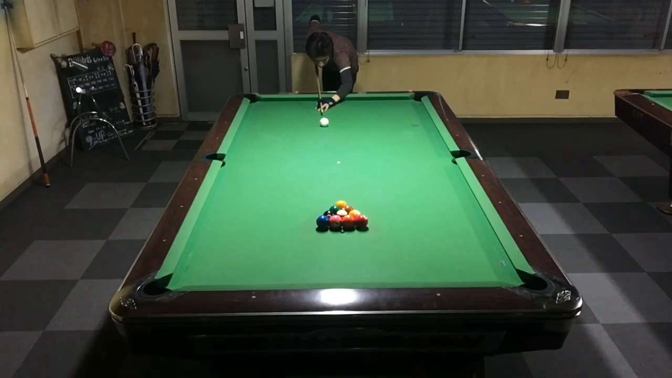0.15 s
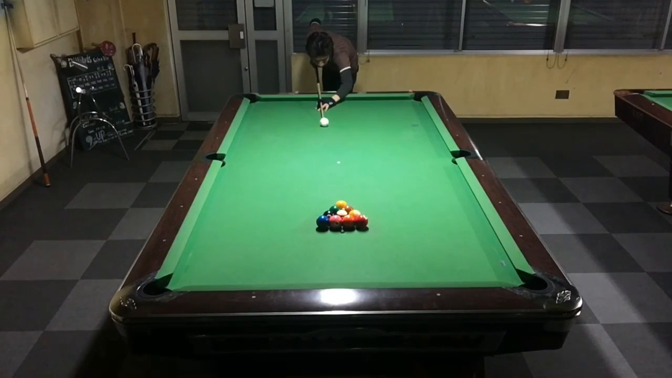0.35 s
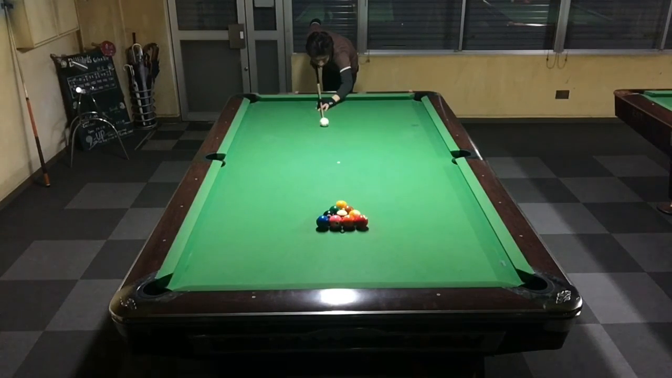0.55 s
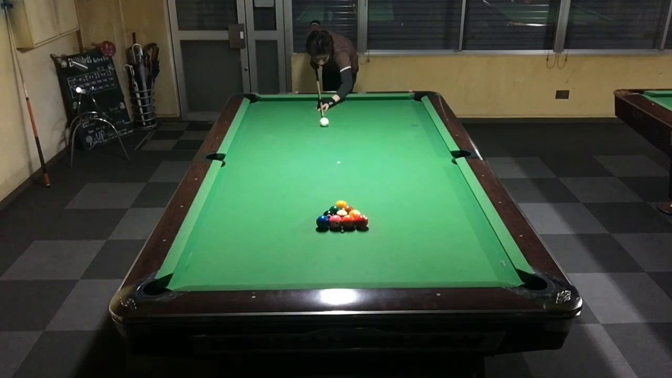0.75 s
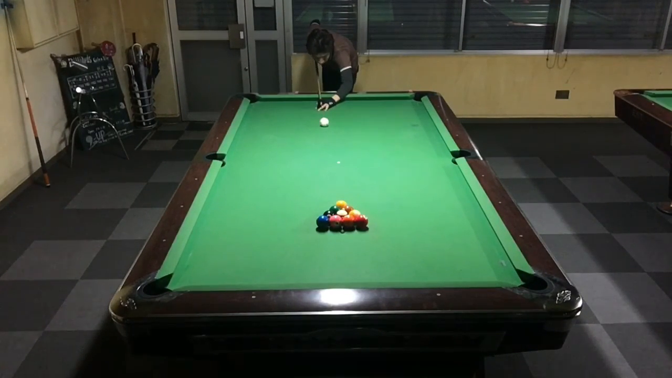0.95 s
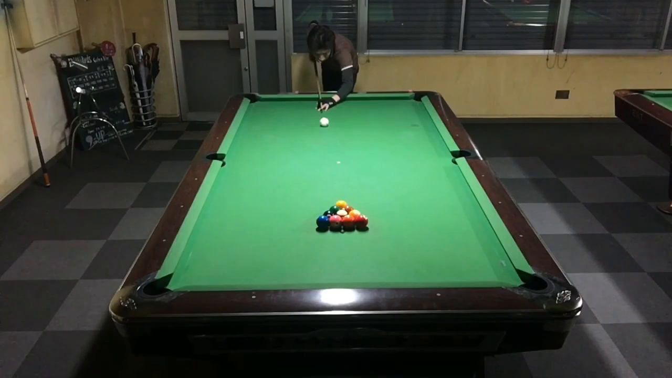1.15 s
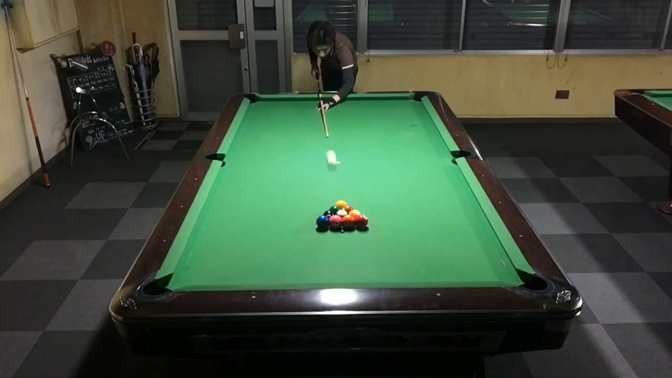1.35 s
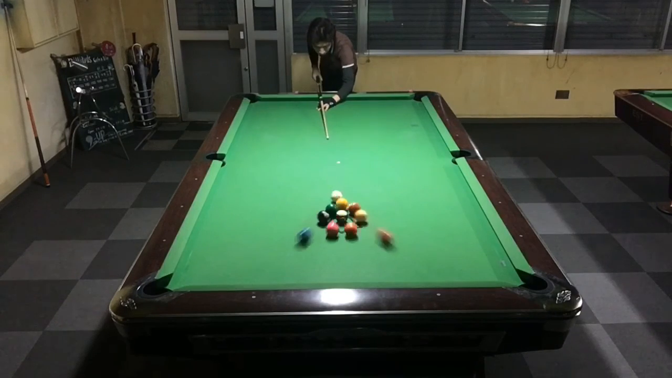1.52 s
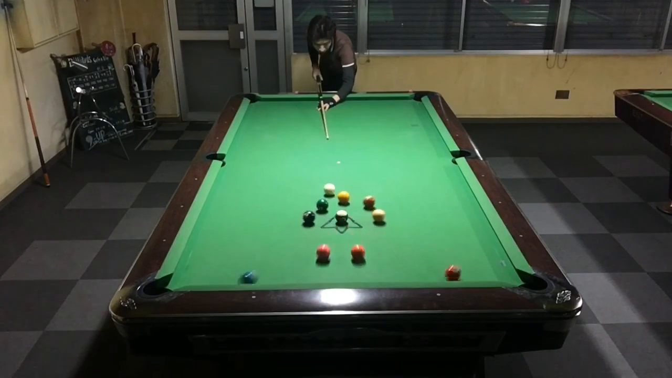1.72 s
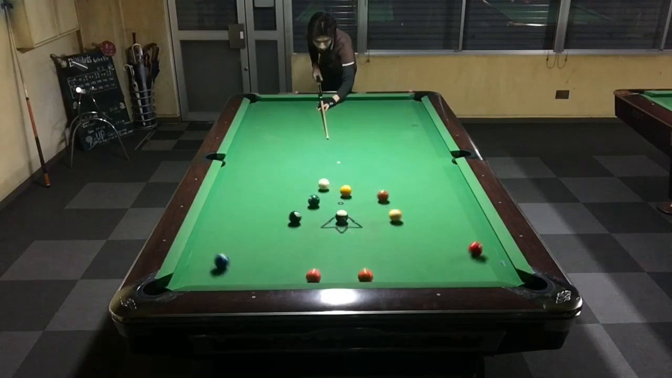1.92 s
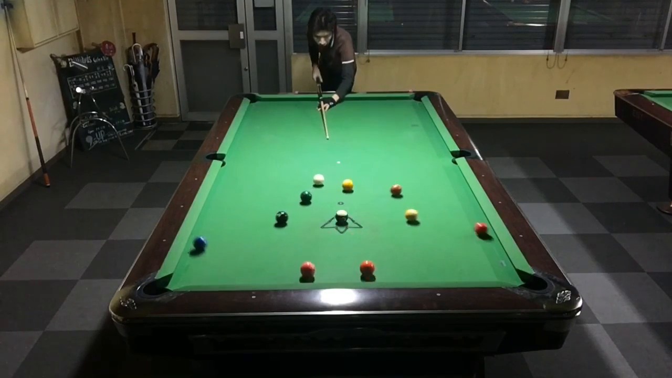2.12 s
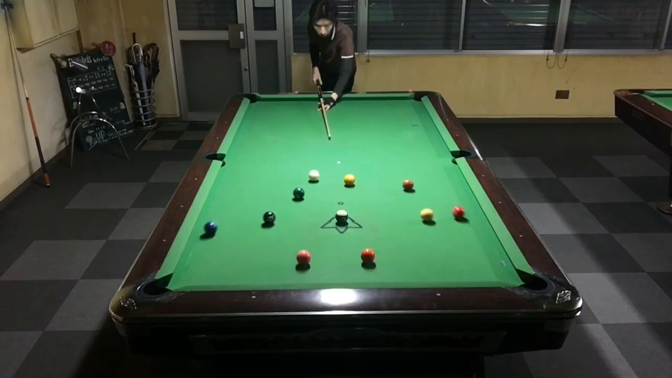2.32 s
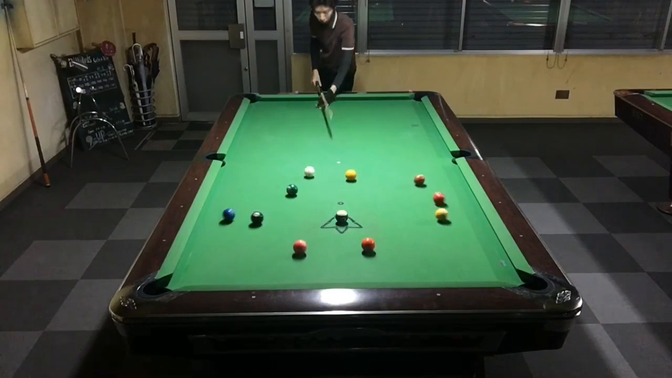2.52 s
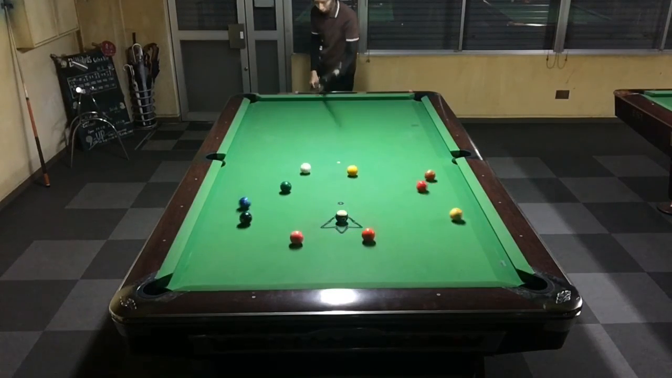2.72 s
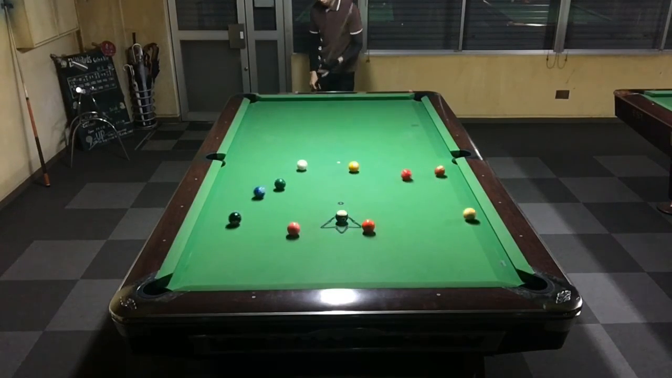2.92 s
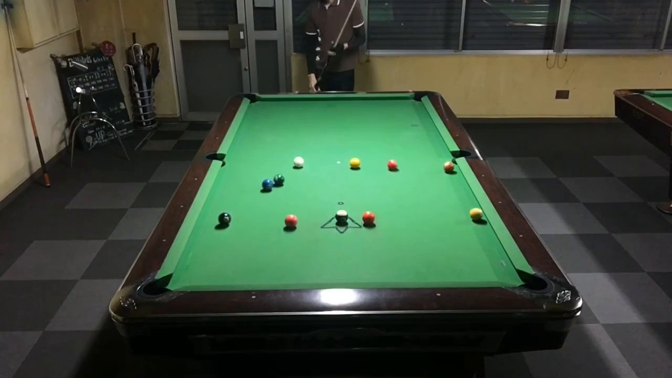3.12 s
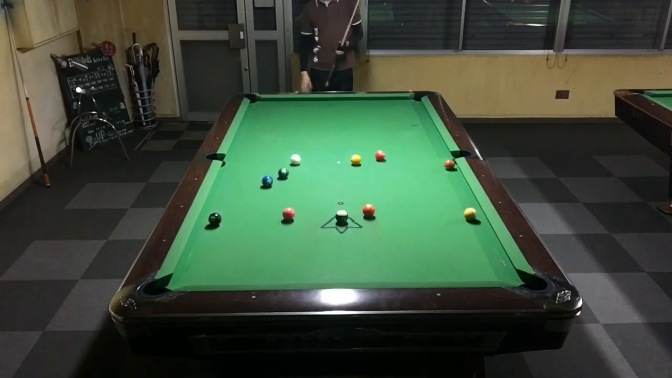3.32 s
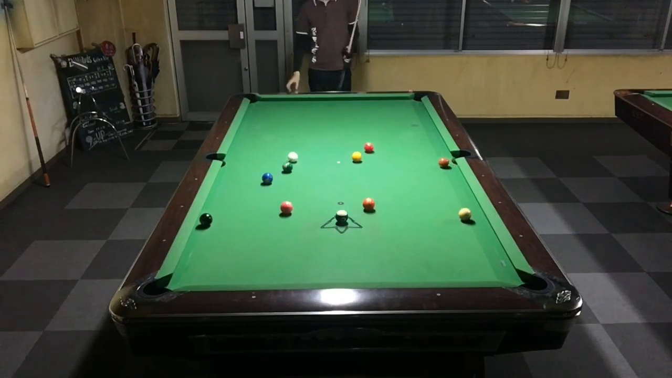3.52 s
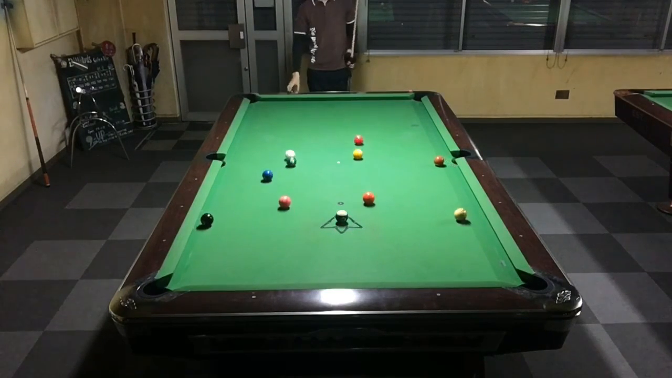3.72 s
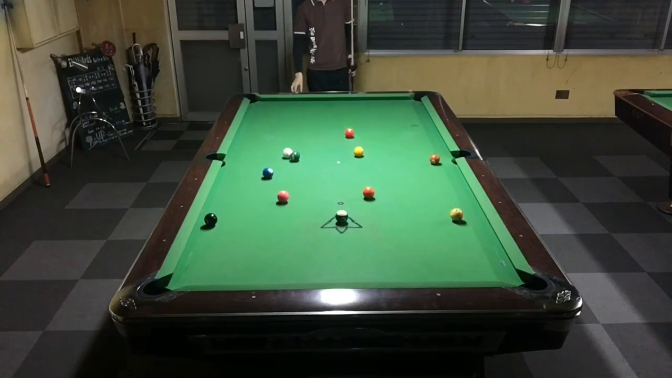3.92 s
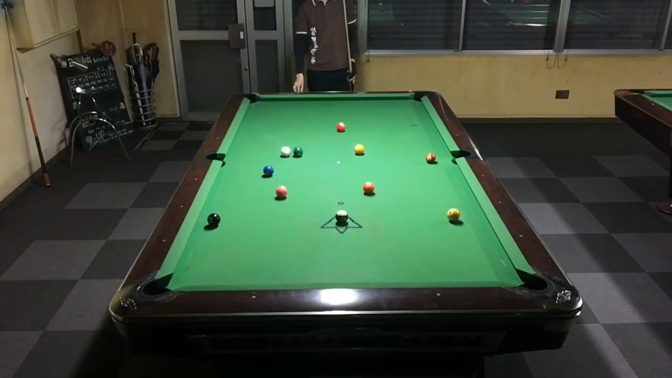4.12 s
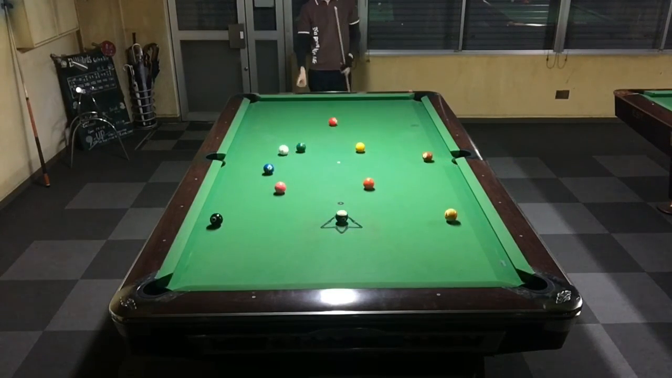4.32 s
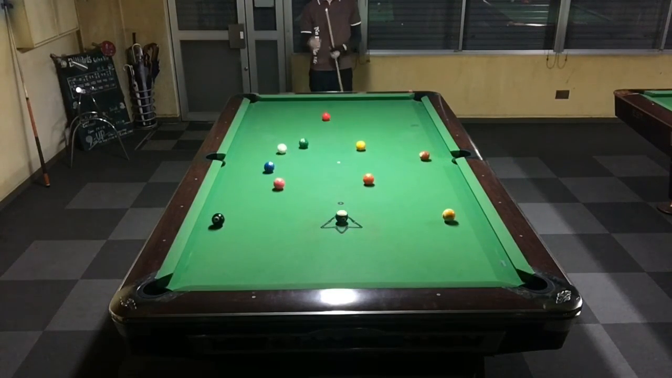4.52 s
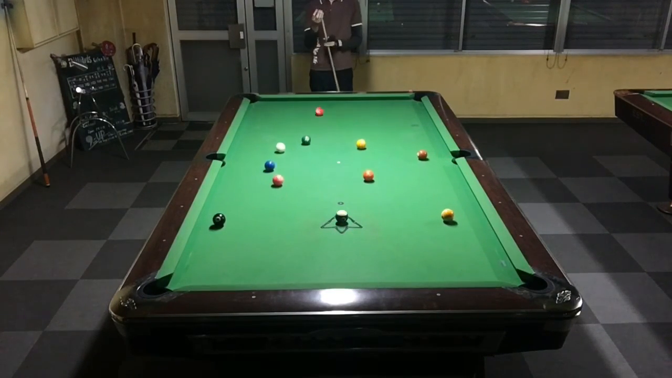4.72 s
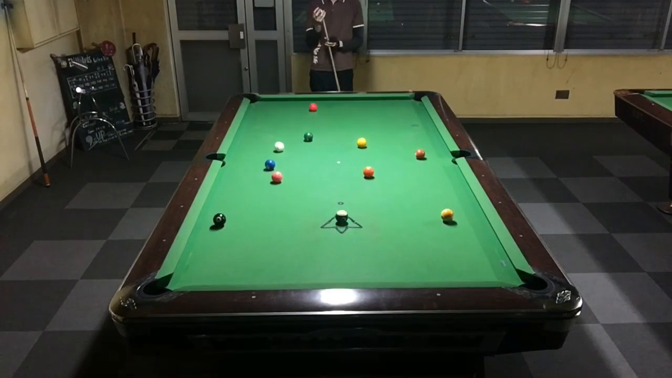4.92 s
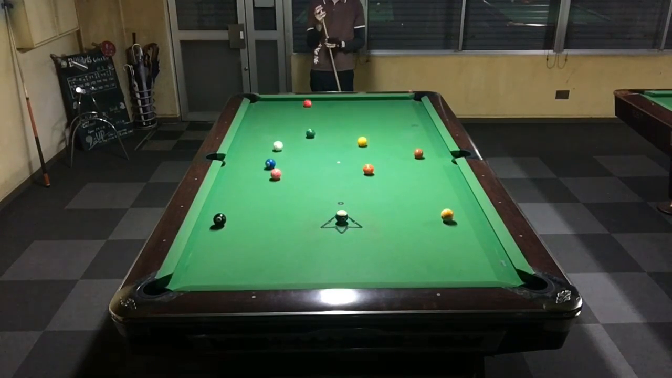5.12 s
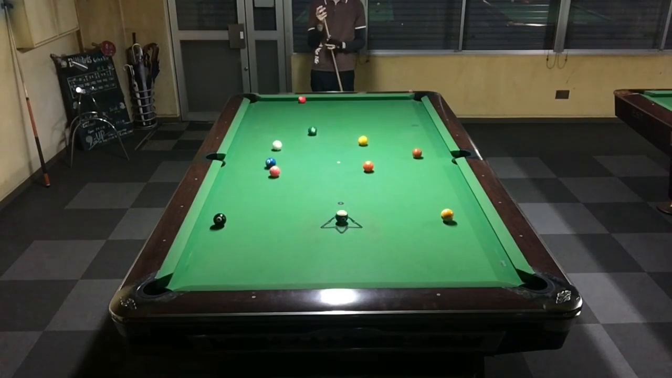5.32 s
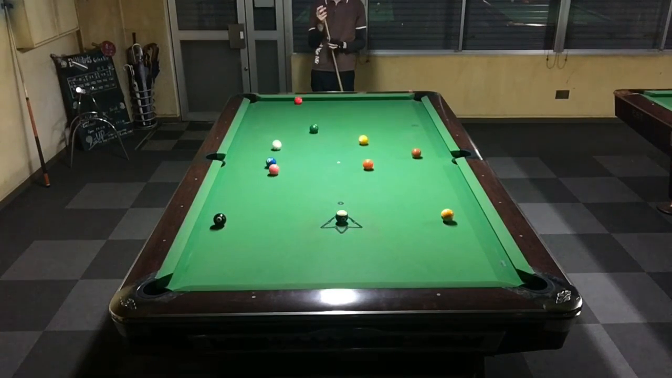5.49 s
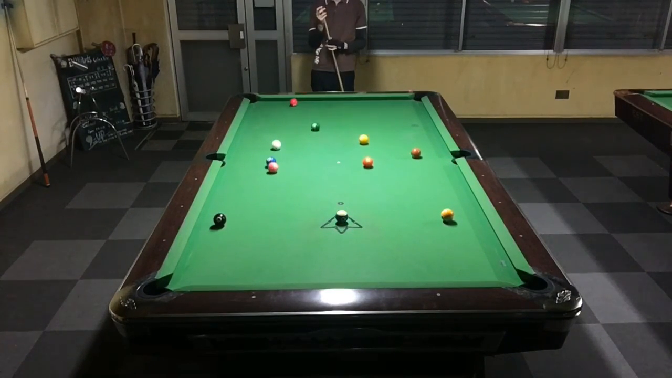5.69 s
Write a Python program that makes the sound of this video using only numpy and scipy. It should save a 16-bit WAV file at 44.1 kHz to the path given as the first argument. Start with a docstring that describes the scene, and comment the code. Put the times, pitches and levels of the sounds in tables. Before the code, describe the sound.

A pool break: low ventilation hum, woody cue hit, loud dense clack of balls with echo, soft knocks, and a short chalk squeak.

```python
"""Break shot on a pool table

In a quiet, hard-walled hall a cue hits the white ball and the rack cracks open: jolted spheres push the air.
Cushions, table frame and floor answer as damped low modes; rolling, a treble hiss, chalk and ventilation
are shaped noise. Two balls meet once more; later come a dull knock with a dry brush, then chalk on the cue tip.
Blows gain discrete echoes and a decaying tail, and the recorder turns its gain down after loud passages.
"""
import sys
import numpy as np
from scipy import signal
from scipy.fft import rfft, irfft
from scipy.io import wavfile
from scipy.ndimage import uniform_filter1d

SR = 44100
rng = np.random.default_rng(int(sys.argv[2]) if len(sys.argv) > 2 else 0)


def to_wav(s):
    """Save 16-bit WAV."""
    ch = np.atleast_2d(s).T  # columns
    pcm = np.round(np.clip(ch, -1, 1) * 32767)  # PCM
    wavfile.write(sys.argv[1], SR, pcm.astype(np.int16))


N = 253575

# Ventilation spectrum: (frequency [Hz], relative density [dB per Hz])
AIR_SPECTRUM = [(11, -33), (24, -25.5), (36, -20.5), (49, -4), (70, -2), (90, -13), (123, -3), (145, -17.5),
                (171, -4.5), (239, -8), (374, -16.5), (800, -24.5), (2000, -30.5), (5000, -41.5),
                (9000, -50.5), (15700, -56.5)]
# Duct tones: (frequency [Hz], width [Hz], height [dB])
DUCT_TONES = [(59.2, 9.9, 0.5), (120.4, 12, 0), (208.2, 60, 5.5), (455, 47, 4.5), (700, 60, 6)]
# Cue tip on the white ball, then ball on cloth:
# (time [s], peak level [dB], contact [ms], ring frequency [Hz], ring t60 [ms])
CUE_BLOWS = [(1.3122, -11, 0.95, 770, 1.7), (1.3235, -19, 0.42, 2840, 9.6), (1.3432, -22, 0.22, 1900, 7.8),
             (1.509, -33, .4, 2216, 2.5)]
# Modes of the stick: (frequency [Hz], relative level [dB], t60 [s])
STICK_MODES = [(410, 1.5, .12), (617.42, -13, 0.088), (1033.3, 0, 0.066), (1309, -10.5, .08),
               (1967, -4.5, .15), (2181.4, -10, 0.0844), (2530.3, -13.5, 0.056), (2972, -8.5, 0.051),
               (3236, -12.5, 0.092), (3680, -22, 0.033), (5960, -30, 0.023)]
# Noise on the cue contact, level against the blow before band filtering:
# (low edge [Hz], high edge [Hz], level [dB], decay time constant [ms])
CUE_RUSTLE = [(3320, 6400, -24, 14), (5400, 8800, -37.5, 12), (9930, 16900, -46.5, 16)]
# Balls set rolling: (time [s], rumble level before rise and fade [dB])
ROLL_STARTS = [(1.3124, -33.5), (1.5322, -41)]
# Rumble of slate and frame: (frequency [Hz], relative density [dB per Hz])
RUMBLE_SPECTRUM = [(29, -47.5), (50, -20.5), (113, -3), (265, -3), (403, -0.5), (450, -4), (700, -10),
                   (910, -34), (1540, -120)]
# Knocks on cushions, table frame and floor: (time [s], level before the low-pass [dB], pitch [Hz])
KNOCKS = [(1.331, -41, 107.2), (1.7, -35.5, 121.6), (1.788, -36, 179.9), (2.07, -47, 132.1),
          (2.211, -46, 230.5), (2.279, -52, 119.3), (3.27, -49, 162.4), (4.029, -54, 63.13),
          (4.363, -46, 87.07), (4.375, -51.5, 316), (4.386, -45, 159.8), (4.424, -51, 110.7)]
# Clacks of the break: ball contacts, their strong early reflections and later duller knocks, each ringing
# briefly. The last row is the later meeting of two balls:
# (time [s], peak level [dB], ring frequency [Hz], extra rasp [dB])
CLACK_EVENTS = [(1.5322, -2, 2330, -1.5), (1.5343, -3, 2386, -1), (1.5358, -2, 2102, 0),
                (1.5412, -9.5, 2395, 5), (1.5460, -6.5, 2770, 0), (1.5511, -9, 2423, 0),
                (1.5534, -7.5, 2850, -7), (1.5548, -6.5, 2830, 7), (1.5577, -5, 2720, 0),
                (1.5590, -3.5, 2280, -1), (1.5718, -7, 2334, -1), (1.5905, -11.5, 2734, -1),
                (1.5991, -5.5, 2034, -2.5), (1.74, -14, 2270, -12), (1.79, -13.5, 2250, -20),
                (1.81, -15.5, 2008, -20), (3.1284, -18.5, 2270, 2.5)]
# Bright rasp on each clack, level against the clack before band filtering:
# (low edge [Hz], high edge [Hz], level [dB], decay time constant [ms])
CLACK_RASP = [(3650, 6240, -27.5, .8), (7000, 11000, -55.5, 1.2), (11480, 17000, -44, 0.88)]
# Treble hiss that grows after the break and stops short: (start [s], length [s], level at the end [dB])
HISS_TIMES = [(1.72, .315, -75.5)]
# Treble hiss spectrum: (frequency [Hz], relative density [dB per Hz])
HISS_SPECTRUM = [(3000, -16), (6000, 0), (10000, -7), (15500, -11)]
# Dry brush with the knock: (start [s], length [s], level at the end [dB])
SCUFF_TIMES = [(4.37, .005, -72)]
# Chalk strokes, pressing harder to the end: (start [s], length [s], level at the end [dB])
CHALK_TIMES = [(5.085, 0.23, -63.5), (5.67, 0.09276, -65.5)]
# Dry friction spectrum: (frequency [Hz], relative density [dB per Hz])
FRICTION_SPECTRUM = [(600, -14.5), (1000, -9), (2000, -12), (3000, -10), (4600, -16), (6000, -17.5),
                     (9000, -24.5), (10500, -34), (12500, -26.5), (15600, -33)]
# Cue tip singing under the chalk: (frequency [Hz], width [Hz], height [dB])
TIP_RESONANCES = [(1554.3, 64.63, 13), (2122.4, 60, 11), (2772.7, 179.3, 5)]
# First echoes: a bounce off the table under the balls, then ceiling, walls and windows: (delay [s], level [dB])
FIRST_ECHOES = [(.0006, -9.5), (.0076, -10), (.0095, -17.5), (0.0128, -12.5), (0.0177, -15),
                (0.0192, -12.5), (0.0225, -5.5), (.0245, -12), (0.061, -11), (0.0835, -13.5)]
# Reverberation time of the hall: (frequency [Hz], t60 [s])
HALL_DECAY = [(100, 1.6), (400, 1.3), (1000, 1.21), (2000, 0.93), (3500, 0.73), (6000, 0.71), (9000, 0.22),
              (14000, .2)]
# Coupling of each place on the table to the hall: (gain of echoes [dB], gain of tail [dB])
FAR_END, RACK, MID_TABLE = (-8.5, -34), (-2, -30), (-0.87, -32.5)

AIR_DB = -57.5
CUE_RING_DB = -29.5  # added to every stick mode
BALL_RADIUS_M, SOUND_M_S = .0286, 343
ROLL_RISE_S, ROLL_FADE_DB_PER_S = 0.016, 39
THUMP_CYCLES = 17.1  # oscillations until 60 dB down
# contact of a 0 dB clack, longer when softer; ring at the usual pitch, longer when higher (power laws)
CONTACT_MS, SOFTER_POWER = 0.25, .27
USUAL_HZ, RING_T60_MS, RING_POWER = 2430.5, 2, 5.5
# random light touches: start, mean wait, level at the start, fading, half-widths of level and relative pitch
CROWD_S, CROWD_WAIT_S, CROWD_DB, CROWD_FADE_DB_PER_S = 1.537, .04, -17.5, 79
CROWD_SPREAD_DB, CROWD_PITCH_SPREAD = 4, .2
HALL_RISE_S = .005
GAIN_START_DB, GAIN_SHARE = -31, 0.26  # threshold, and share of the excess that is taken away
GAIN_ATTACK_S, GAIN_RELEASE_S_PER_6_DB = .04, 0.14
CUTOFF_HZ = 15750


def amp(db):
    """Decibel law: 20 dB is a tenfold amplitude."""
    return 10 ** (np.asarray(db) / 20)


def rms_one(x):
    """Normalization of power: scales a signal to rms 1."""
    return x / np.sqrt(np.mean(x ** 2) + 1e-20)


def at_hz(points, hz):
    """Logarithmic frequency scale: reads a table linearly in log frequency."""
    table = np.array(points)
    return np.interp(np.log(hz), np.log(table[:, 0]), table[:, 1])


def band_pass(low_hz, high_hz, x):
    """Band limitation: passes only what lies about between two edges."""
    sos = signal.butter(2, [low_hz, high_hz], "band", fs=SR, output="sos")
    return signal.sosfilt(sos, x)


def coloured(spectrum, peaks=()):
    """Spectral shaping: white noise weighted by a spectrum with raised resonances, rms 1."""
    hz = np.maximum(np.arange(N // 2 + 1) * SR / N, 1)
    db = at_hz(spectrum, hz)
    for mid_hz, wide_hz, top_db in peaks:
        db = db + top_db / (1 + (2 * (hz - mid_hz) / wide_hz) ** 2)
    white = rfft(rng.standard_normal(N))
    return rms_one(irfft(white * amp(db) * (hz > 10), N))


def flicker(rate_hz, depth_db):
    """Amplitude modulation: a random gain of given rms depth, limited to slow rates."""
    sos = signal.butter(2, rate_hz, fs=SR, output="sos")
    slow = signal.sosfilt(sos, rng.standard_normal(N + SR))[SR:]  # drop the filter's start-up
    return amp(depth_db * rms_one(slow))


def spells(rows, rise_db_per_s, swell_db_per_s, fall_db_per_s):
    """Exponential envelope: rises to each start, swells to the end and falls, in straight dB ramps."""
    t = np.arange(N) / SR
    gain = np.zeros(N)
    for start, length, end_db in rows:
        end = start + length
        rise = rise_db_per_s * np.maximum(start - t, 0)
        swell = swell_db_per_s * np.clip(end - t, 0, length)
        fall = fall_db_per_s * np.maximum(t - end, 0)
        gain += amp(end_db - rise - swell - fall)
    return gain


def ring(force, hz, t60):
    """Damped resonator: a unit click sets one mode ringing as a decaying sine of height 1."""
    r = amp(-60 / (t60 * SR))
    w = 2 * np.pi * hz / SR
    return signal.lfilter([0, np.sin(w)], [1, -2 * r * np.cos(w), r * r], force + 1e-18)


def jolts(blows, roundness, direct_share):
    """Acceleration noise: a short force bump makes a rigid sphere push the air; a brief ring is added."""
    w = SOUND_M_S / BALL_RADIUS_M
    b, a = signal.bilinear([w, 0], [1, 2 * w, 2 * w * w], SR)  # radiation of the sphere
    out, t = np.zeros(N), np.arange(512) / SR
    for s, db, contact_ms, hz, t60_ms in blows:
        force = np.sin(np.pi * np.clip(1000 * t / contact_ms, 0, 1)) ** roundness
        pulse = signal.lfilter(b, a, np.gradient(force))
        pulse = direct_share * pulse + ring(pulse, hz, t60_ms / 1000)
        at = round(s * SR)
        out[at:at + 512] += amp(db) * pulse / np.abs(pulse).max()
    return out


def snaps(blows, rasp):
    """Contact noise: each blow (time [s], level [dB]) starts decaying bursts in several bright bands."""
    out, t = np.zeros(N), np.arange(4096) / SR
    for low_hz, high_hz, rasp_db, decay_ms in rasp:
        bursts = rng.standard_normal((len(blows), 4096)) * np.exp(-1000 * t / decay_ms)
        bursts = band_pass(low_hz, high_hz, bursts)
        for (s, db), burst in zip(blows, bursts):
            out[round(s * SR):][:4096] += amp(db + rasp_db) * burst
    return out


def ventilation():
    """Broadband flow noise: a low hum with raised duct tones and a slight, slow flicker."""
    return amp(AIR_DB) * flicker(1.6, depth_db=0.53) * coloured(AIR_SPECTRUM, DUCT_TONES)


def cue():
    """Impact and modal ringing: the tip thuds on the ball while the stick rings and rustles on."""
    click = np.zeros(N)
    click[round(CUE_BLOWS[0][0] * SR)] = 1
    stick = sum(amp(db + CUE_RING_DB) * ring(click, hz, t60) for hz, db, t60 in STICK_MODES)
    thud = -jolts(CUE_BLOWS, roundness=1.3, direct_share=0.34)
    rustle = snaps([CUE_BLOWS[0][:2]], CUE_RUSTLE)
    return thud + stick + rustle


def rolling():
    """Rolling noise: slate and frame rumble, dying exponentially as the balls slow down."""
    gain = np.zeros(N)
    for s, db in ROLL_STARTS:
        since = np.maximum(np.arange(N) / SR - s, 0)
        gain += (1 - np.exp(-since / ROLL_RISE_S)) * amp(db - ROLL_FADE_DB_PER_S * since)
    return gain * flicker(12.484, depth_db=1.5) * coloured(RUMBLE_SPECTRUM)


def thumps():
    """Modal excitation: each soft blow sets one low mode ringing, and a low-pass dulls it."""
    out = np.zeros(N)
    for s, db, hz in KNOCKS:
        click = np.zeros(N)
        click[round(s * SR)] = amp(db)
        out += ring(click, hz, THUMP_CYCLES / hz)
    return signal.sosfilt(signal.butter(2, 500, fs=SR, output="sos"), out)


def clacks(rows, roundness, direct_share):
    """Elastic contact law: louder clacks have a briefer force bump, and every clack carries a rasp."""
    blows, rasps = [], []
    for s, db, hz, rasp_db in rows:
        contact_ms = CONTACT_MS / amp(db) ** SOFTER_POWER
        t60_ms = RING_T60_MS * (hz / USUAL_HZ) ** RING_POWER
        blows.append((s, db, contact_ms, hz, t60_ms))
        rasps.append((s, db + rasp_db))
    return jolts(blows, roundness, direct_share) + snaps(rasps, CLACK_RASP)


def crowd(count):
    """Random arrivals: exponential waits scatter light touches, thinning and fading as the balls part."""
    wait, loud, pitch = rng.random((count, 3)).T
    wait = -CROWD_WAIT_S * np.log(1 - wait)
    db = CROWD_DB - CROWD_FADE_DB_PER_S * wait + CROWD_SPREAD_DB * (2 * loud - 1)
    hz = USUAL_HZ * (1 + CROWD_PITCH_SPREAD * (2 * pitch - 1))
    return list(zip(CROWD_S + wait, db, hz, np.zeros(count)))


def hiss():
    """High-frequency noise: a thin treble hiss grows and stops short."""
    gain = spells(HISS_TIMES, rise_db_per_s=108, swell_db_per_s=6, fall_db_per_s=1600)
    return gain * coloured(HISS_SPECTRUM)


def scuff():
    """Dry friction: a brief brush of fine noise."""
    gain = spells(SCUFF_TIMES, rise_db_per_s=599.5, swell_db_per_s=0.5, fall_db_per_s=115)
    return gain * coloured(FRICTION_SPECTRUM)


def chalk():
    """Friction coupled to resonance: fine rubbing noise is coloured by the stick under the chalk."""
    gain = spells(CHALK_TIMES, rise_db_per_s=229, swell_db_per_s=34, fall_db_per_s=95)
    return gain * coloured(FRICTION_SPECTRUM, TIP_RESONANCES)


def hall(sources):
    """Room acoustics: direct sound, single echoes, then a dense tail that dies band by band."""
    t = np.arange(2 * SR) / SR
    edges = 50 * 2 ** np.arange(0, 8.6, .5)  # half octaves [Hz]
    white = rng.standard_normal((2, len(t)))  # neighbouring bands use different noise
    tail = np.zeros(len(t))
    for k, (low, high) in enumerate(zip(edges, edges[1:])):
        t60 = at_hz(HALL_DECAY, np.sqrt(low * high))
        tail += band_pass(low, high, white[k % 2]) * amp(-60 * t / t60)
    tail *= 1 - np.exp(-t / HALL_RISE_S)
    echoes = np.zeros(SR // 8)
    for s, db in FIRST_ECHOES:
        echoes[round(s * SR)] = amp(db)
    direct = sum(x for x, place in sources)
    to_echoes = sum(x * amp(place[0]) for x, place in sources)
    to_tail = sum(x * amp(place[1]) for x, place in sources)
    early = signal.fftconvolve(to_echoes, echoes)[:N]
    late = signal.fftconvolve(to_tail, tail)[:N]
    return direct + early + late


def scene():
    """Superposition: blows sound through the hall; the steady and rubbing sounds are added without it."""
    rack = clacks(CLACK_EVENTS[:-1] + crowd(count=24), roundness=1.9, direct_share=0.8)
    last_meeting = -clacks(CLACK_EVENTS[-1:], roundness=2.12, direct_share=0.28)
    blows = hall([(cue() + thumps(), FAR_END), (rack, RACK), (last_meeting, MID_TABLE)])
    return (ventilation() + blows + rolling() + hiss() + scuff() + chalk())[None]


def record(dry):
    """Gain compression: loud passages pull the gain down a moment later, it recovers, and the top is cut."""
    level = 10 * np.log10(uniform_filter1d(dry[0] ** 2, 441) + 1e-12)  # mean power over 10 ms
    fall = np.arange(N) / SR * 6 / GAIN_RELEASE_S_PER_6_DB
    held = np.maximum.accumulate(level + fall) - fall  # peak level, sinking steadily in dB
    over = np.maximum(held - GAIN_START_DB, 0)
    r = np.exp(-1 / (GAIN_ATTACK_S * SR))
    smooth_over = signal.lfilter([1 - r], [1, -r], over)
    gain = amp(-GAIN_SHARE * smooth_over)
    top_cut = signal.cheby2(16, 30, CUTOFF_HZ, fs=SR, output="sos")  # 30 dB down from the cutoff up
    return signal.sosfilt(top_cut, dry * gain)


dry = scene()
out = record(dry)
to_wav(out)
```